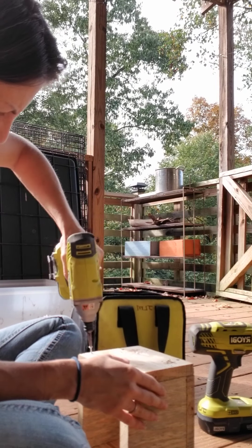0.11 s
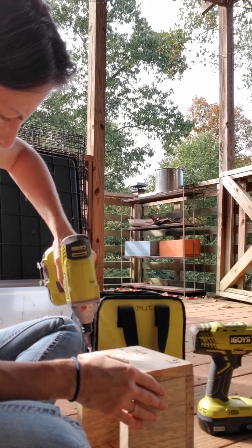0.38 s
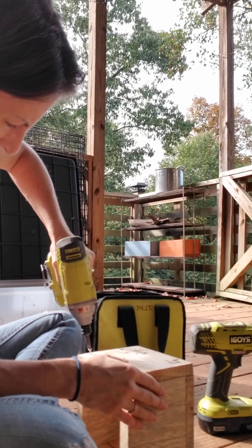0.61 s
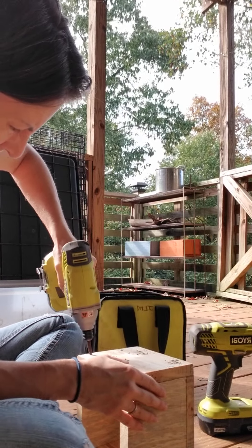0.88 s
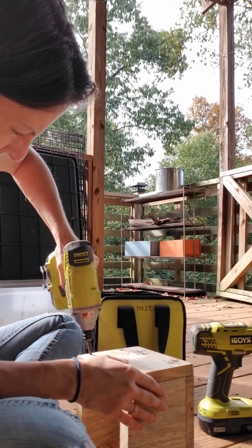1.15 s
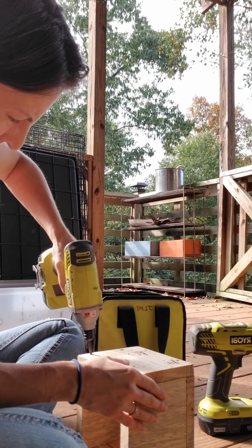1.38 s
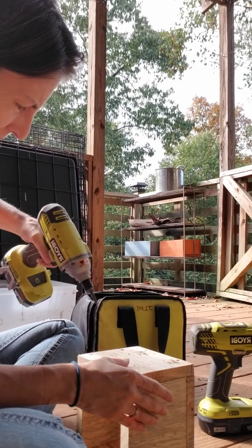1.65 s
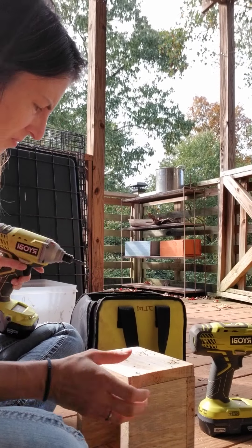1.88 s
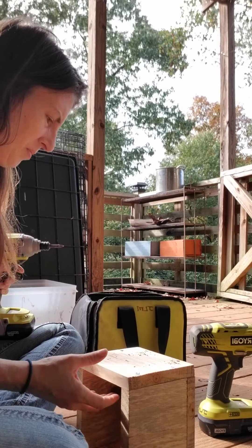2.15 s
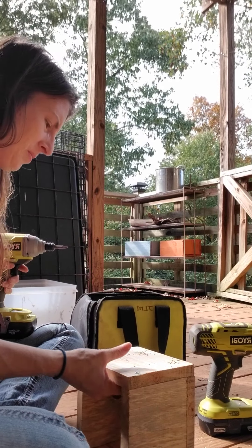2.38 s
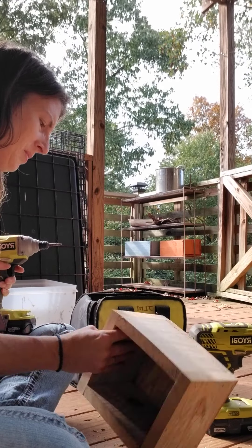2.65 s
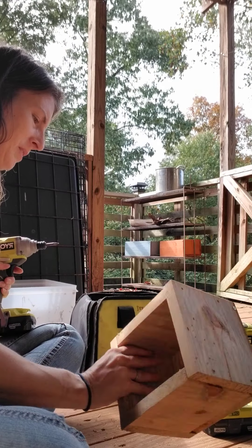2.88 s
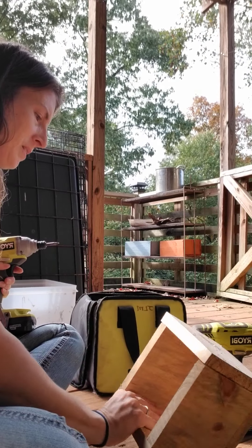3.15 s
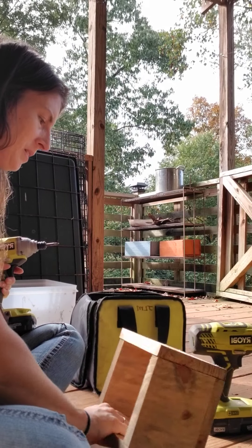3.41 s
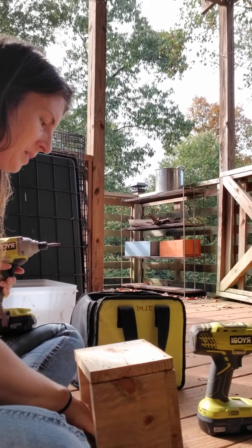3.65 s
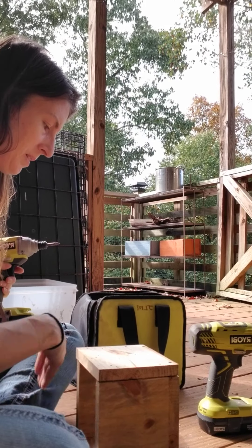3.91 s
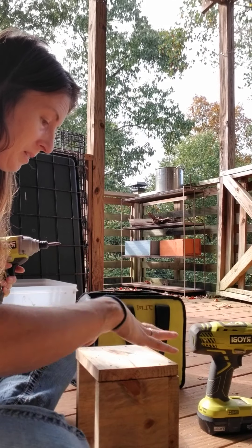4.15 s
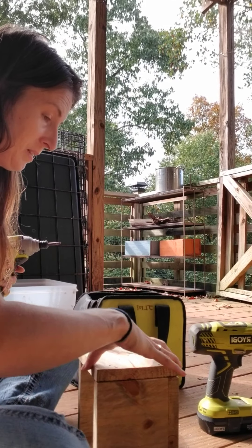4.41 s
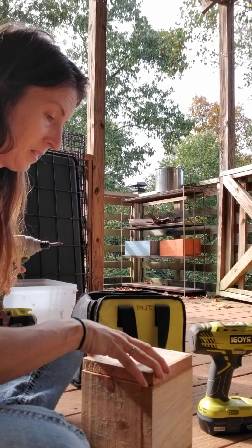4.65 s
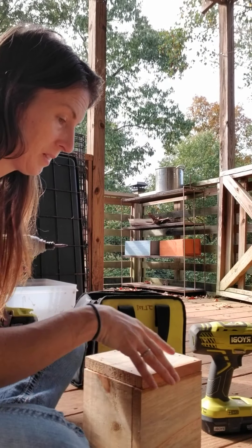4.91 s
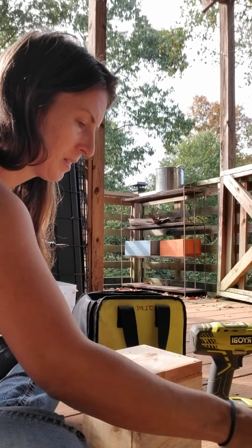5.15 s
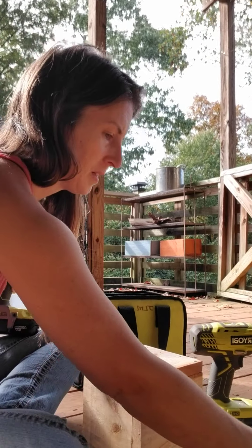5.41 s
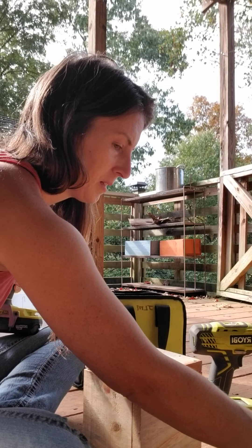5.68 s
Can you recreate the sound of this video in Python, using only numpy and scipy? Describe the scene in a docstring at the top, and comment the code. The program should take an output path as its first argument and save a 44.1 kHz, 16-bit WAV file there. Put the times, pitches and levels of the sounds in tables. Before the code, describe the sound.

Close up on a roofed wooden deck, a cordless driver whines and chatters into a hollow box, then pulses twice more with sharp knocks and steel clacks. Its ratchet clicks slow down, and thin metal rings faintly. The box is tipped, bangs down hard, and is slid and tapped over a low outdoor rumble and faint insects. Stereo, near microphone, stronger on the right.

```python
"""Over a low outdoor rumble and a band of insects, a cordless driver is pulsed three times into a hollow wooden box on
a roofed wooden deck: its gears whine (sine waves), its bit chatters (thuds), steel parts clack (short noise).
A ratchet clicks as the driver coasts, then a thin steel part rings as the driver is lifted.
The box is then tipped, set down and slid about (decaying sines, gritty noise) while a bird whistles once."""
import sys
import numpy as np
from scipy import signal
from scipy.fft import rfft, irfft
from scipy.io import wavfile
from scipy.ndimage import uniform_filter1d

SR = 44100
rng = np.random.default_rng(int(sys.argv[2]) if len(sys.argv) > 2 else 0)


def attenuation_scalar(level_db):
    """Turn a level in dB into a linear amplitude multiplier (20 dB per decade)."""
    decades = np.asarray(level_db, float) / 20
    return 10 ** decades


def generate_wav(sig):
    """Save sig (samples, or channels by samples) to the path in sys.argv[1] as 16-bit PCM at SR."""
    pcm = np.round(np.clip(np.atleast_2d(sig).T, -1, 1) * 32767).astype(np.int16)
    wavfile.write(sys.argv[1], SR, pcm)


N = 255339
T = np.arange(N) / SR  # time of each sample, s
HZ = np.maximum(np.fft.rfftfreq(N, 1 / SR), 1)  # pitch of each step in a spectrum


def rms_one(x):
    """Scale to an average strength (rms) of 1."""
    return x / np.sqrt(np.mean(x ** 2) + 1e-20)


def at_hz(points):
    """Join (pitch, level) points by lines over the logarithm of pitch, one value per spectrum step."""
    pitch_hz, level_db = np.transpose(points)
    return np.interp(np.log(HZ), np.log(pitch_hz), level_db)


def colour(x, points):
    """Filter to the given spectrum, answering as early as that spectrum allows (minimum phase)."""
    cepstrum = irfft(at_hz(points) * np.log(10) / 20, N)
    # folding the second half onto the first leaves nothing sounding before its cause
    cepstrum[1:N // 2] *= 2
    cepstrum[N // 2 + 1:] = 0
    return irfft(rfft(x, N) * np.exp(rfft(cepstrum)), N)


def drift(rate_hz):
    """Slow random wandering with an average strength of 1: noise smoothed twice."""
    r = np.exp(-2 * np.pi * rate_hz / SR)
    noise = rng.standard_normal(N + SR)
    settled = signal.lfilter([1], [1, -2 * r, r * r], noise)[SR:]
    return rms_one(settled)


def grains(spread_db):
    """Stereo noise with uneven sample sizes: grit rather than hiss, with differing treble left and right."""
    size_db = spread_db * np.minimum(rng.exponential(1, N), 5)
    mid, side = rng.standard_normal((2, N)) * attenuation_scalar(size_db)
    side = signal.sosfilt(signal.butter(2, 1700, "high", fs=SR, output="sos"), side)
    return mid + 0.72 * side * [[1], [-1]]


def ring(clicks, hz, t60_s):
    """A resonance: each unit click starts a sine that fades by 60 dB in t60_s."""
    r, w = attenuation_scalar(-60 / (t60_s * SR)), 2 * np.pi * hz / SR
    return signal.lfilter([0, np.sin(w)], [1, -2 * r * np.cos(w), r * r], clicks + 1e-18)


def burst(t60_s, attack_s=0.0001):
    """Outline of a hit: a quick rise, then a fade of 60 dB in t60_s."""
    t = np.arange(int(1.2 * t60_s * SR) + 64) / SR
    return (1 - np.exp(-t / attack_s)) * attenuation_scalar(-60 * t / t60_s)


def stroke(start_s, rise_s, hold_s, level_db, fall_db_per_s):
    """Gain that swells from 27.5 dB down, holds and falls, straight in dB; silent before start_s."""
    t = T - start_s
    rise_db = 27.5 * np.clip(1 - t / rise_s, 0, 1)
    fall_db = fall_db_per_s * np.maximum(t - rise_s - hold_s, 0)
    return (t > 0) * attenuation_scalar(level_db - rise_db - fall_db)


def add(out, start_s, sound):
    """Mix a sound in at time start_s."""
    i = round(start_s * SR)
    out[i:i + len(sound)] += sound[:N - i]


# level of the outdoor background, heard in rumble and insects: (start_s, level_db)
BACKGROUND_LEVEL = [(0, -35.5), (.7, -50), (1.5, -46), (2.2, -50), (3.4, -41), (4.5, -40), (5.79, -41.5)]


def background_level_db():
    """The background's level in time, joined by straight lines."""
    start_s, level_db = np.transpose(BACKGROUND_LEVEL)
    return np.interp(T, start_s, level_db, left=-120, right=-120)


# spectrum of the rumble: (pitch_hz, relative level_db)
RUMBLE_SPECTRUM = [(15, -53.5), (25, -24.5), (76, -3.5), (153, -1), (301, -18.5), (451, -19), (734, -29),
                   (863, -35), (1520, -48), (4740, -56), (6050, -58), (9570, -61.5), (16000, -52.5)]
# how alike left and right are: (pitch_hz, likeness from 0 to 1)
LIKENESS = [(60, 1), (380, 0.92), (2380, 0.041), (15000, 0.03)]
# far machinery, levels against the rumble before a shared lift: (pitch_hz, level_db)
FAR_HUMS = [(457.6, -62), (834.4, -75.5), (1001, -78.5)]


def rumble():
    """Wide low noise with faint wavering hums: deep tones are alike on both sides, high ones are not."""
    alike = np.clip(at_hz(LIKENESS), 0, 1)
    mid, side = rfft(rng.standard_normal((2, N)))
    stereo = np.sqrt(1 + alike) * mid + np.sqrt(1 - alike) * side * [[1], [-1]]
    noise = rms_one(irfft(attenuation_scalar(at_hz(RUMBLE_SPECTRUM)) * stereo, N))
    balance_db = np.array([[-1.], [1.]])  # left, right
    noise = noise * attenuation_scalar(0.59 * drift(20) + balance_db)
    hums = 0
    for pitch_hz, level_db in FAR_HUMS:
        gain = attenuation_scalar(level_db + 46 + drift(3.4))
        hums = hums + gain * np.sin(2 * np.pi * pitch_hz * T + 0.5 * drift(5.4))
    return attenuation_scalar(background_level_db()) * (noise + hums)


def insects():
    """A flickering band of noise near 6 kHz that rises and falls with the background level."""
    band = signal.butter(3, [5350, 6550], "band", fs=SR, output="sos")
    noise = rms_one(signal.sosfilt(band, rng.standard_normal((2, N))))
    swing_db = background_level_db() - np.mean(BACKGROUND_LEVEL, axis=0)[1]
    return attenuation_scalar(-79.5 + 0.96 * swing_db + 2 * drift(25)) * noise


# one whistle: (start_s, rise_s, hold_s, level_db, fall_db_per_s)
BIRD_STROKE = (3.8, .2, .2, -81, 90)


def bird():
    """One whistle: a sine that steadily falls in pitch and flickers in level."""
    pitch_hz = 3620 - 1100 * (T - BIRD_STROKE[0])
    whistle = np.sin(2 * np.pi * np.cumsum(pitch_hz) / SR)
    return stroke(*BIRD_STROKE) * attenuation_scalar(3 * drift(30)) * whistle


# wood and skin sliding on wood; swish_db is the bright part against the dull part:
# (start_s, rise_s, hold_s, level_db, fall_db_per_s, swish_db)
SLIDE_STROKES = [(2.462, .03, 0.23, -65.5, 42, -11.5), (3.387, 0.22, 0.027, -54.5, 64, -16.5),
                 (3.702, 0.043, .17, -73, 604, -2.5), (4.37, 0.017, 0.15, -56.5, 200, -18),
                 (4.535, 0.037, .01, -50.5, 81, -16), (4.792, .12, .08, -68.5, 501, 0.5),
                 (4.949, .05, .9, -74, 100, -8)]
# spectrum of the dull part: (pitch_hz, relative level_db)
SLIDE_SPECTRUM = [(200, -17.5), (400, -10.5), (950, 3), (1400, -13), (2500, -17.5), (3500, -19),
                  (6000, -26), (9000, -54.5)]


def slides():
    """Wood and skin rub on wood: dense grit swells and falls, with a brighter swish on top."""
    swish_spectrum = [(6500, -34), (8500, -3.0), (10500, -14.5), (13000, -2.5), (15500, -6)]
    dull = rms_one(colour(grains(2.5), SLIDE_SPECTRUM)) * attenuation_scalar(2 * drift(30))
    swish = rms_one(colour(grains(3), swish_spectrum)) * attenuation_scalar(2 * drift(17))
    return sum(stroke(*row[:5]) * (dull + attenuation_scalar(row[5]) * swish) for row in SLIDE_STROKES)


# ways the box rings: (pitch_hz, relative level_db, t60_s = time to fade 60 dB)
BOX_MODES = [(77, -8, .08), (140, -3, .08), (190, -4, .05), (275, -5, .07), (424, -6, .06), (545, -4, .05),
             (600, -6, .05), (680, -8, .04), (880, -14, .03), (1100, -19, .025)]


def box_body(level_db, hardness_db, chances):
    """The box's ringing tones, each with a chance strength and pitch; hard blows favour the high ones."""
    t = np.arange(SR // 2) / SR
    body = 0
    for k, ((pitch_hz, mode_db, t60_s), chance) in enumerate(zip(BOX_MODES, chances)):
        start_db = mode_db + hardness_db * np.log2(pitch_hz / 400) + 2 * chance
        tone = np.sin(2 * np.pi * pitch_hz * (1 + .025 * chance) * t)
        body = body + (-1) ** k * attenuation_scalar(start_db - 60 * t / t60_s) * tone
    # the onset is stronger, for longer when the blow is light
    push_s = max(.0022 - .00006 * level_db, .0005)
    body *= -2.5 - np.exp(-t / push_s)
    return attenuation_scalar(level_db) * body / np.abs(body).max()


# thin edge of the box: (pitch_hz, level_db against the crack, t60_s)
EDGE_MODES = [(2550, -10, .04), (3600, -9, .035)]


def box_edge(level_db, chances):
    """The thin edge of the box rings with the crack."""
    t = np.arange(SR // 2) / SR
    tones = 0
    for (pitch_hz, mode_db, t60_s), chance in zip(EDGE_MODES, chances):
        gain = attenuation_scalar(level_db + mode_db + 2.6 * chance - 60 * t / t60_s)
        tones = tones + gain * np.sin(2 * np.pi * pitch_hz * (1 + 0.023 * chance) * t)
    return tones


# blows on box and deck; crack_db is against the blow: (start_s, level_db, hardness_db per octave, crack_db)
BLOWS = [(0.762, -16, 0.5, -18), (0.793, -11.5, -1, -22), (1.09, -30.5, 9, -22), (1.109, -16, 28, -27.5),
         (1.174, -14, 3, -19.5), (1.216, -35, -17, -29.5), (1.254, -18, 2, -29), (1.357, -27, 11, -22),
         (2.474, -46.5, 21, -13.5), (2.542, -37, 7, -35), (3.088, -11, -2, -21.5), (3.191, -15.5, -4, -26),
         (3.254, -12, 1, -37.5), (3.333, -12.5, -1, -33), (3.355, -26, 1, -41), (3.5642, 0.5, 4, -30),
         (3.695, -19, -4, -23.5), (3.894, -25, -3, -36), (4.435, -36, 1.5, -15), (4.572, -23, -0.5, -22.5),
         (4.612, -22, -4.5, -25.5), (4.636, -21.5, 2.5, -21.5), (4.685, -26, -3, -24),
         (4.722, -23.5, -1, -34)]
# spectrum of the crack: (pitch_hz, relative level_db)
CRACK_SPECTRUM = [(500, -3), (1500, -5.5), (2500, 4), (3500, -8), (6500, -23), (8500, -13.5),
                  (12500, -21.5), (16000, -22)]
# spectrum of the shuddering deck boards: (pitch_hz, relative level_db)
SHUDDER_SPECTRUM = [(50, -8.5), (90, 5), (250, 19), (600, 3), (1000, -21), (1500, -23.5), (2500, -47.5),
                    (3500, -52), (8000, -53)]
# spectrum of the boards clattering on: (pitch_hz, relative level_db)
RATTLE_SPECTRUM = [(700, -17), (1300, -1), (2000, 1), (2700, 1.5), (3300, -11.5), (5000, -19),
                   (9000, -23.5), (16000, -38.5)]


def blows():
    """Each blow rings the box, cracks briefly at its edge and leaves loose deck boards shaking as noise."""
    tones, cracks, shudders, rattles = np.zeros((4, N))
    chance = rng.standard_normal((len(BLOWS), len(BOX_MODES)))
    for (start_s, level_db, hardness_db, crack_db), chances in zip(BLOWS, chance):
        edge_s = start_s + .003  # the edge lands after the body
        add(tones, start_s, box_body(level_db, hardness_db, chances))
        add(tones, edge_s, box_edge(level_db + crack_db, chances))
        add(cracks, edge_s, attenuation_scalar(level_db + crack_db) * burst(0.032, attack_s=0.0019))
        add(shudders, start_s, attenuation_scalar(level_db - 18.5) * burst(0.27, attack_s=0.0034))
        # clattering grows faster than the blow itself
        add(rattles, start_s, attenuation_scalar(1.6 * level_db - 34) * burst(.35, attack_s=.005))
    shudder = shudders * rms_one(colour(grains(2.7), SHUDDER_SPECTRUM))
    rattle = rattles * rms_one(colour(grains(5), RATTLE_SPECTRUM))
    crack = cracks * rms_one(colour(grains(2), CRACK_SPECTRUM))
    return tones + shudder + rattle + crack


# the driver's chuck rings once: (start_s, level_db, pitch_hz, t60_s)
CHUCK_RING = (1.3165, -21, 1090, .04)


def chuck_ring():
    """The driver's chuck rings once: one short fading tone."""
    start_s, level_db, pitch_hz, t60_s = CHUCK_RING
    envelope = burst(t60_s, attack_s=.003)
    out = np.zeros(N)
    add(out, start_s, attenuation_scalar(level_db) * envelope * np.sin(2 * np.pi * pitch_hz * T[:len(envelope)]))
    return out


def ratchet():
    """Coasting ratchet clicks as clack rows: ever slower, softer in steps, two clicks at about the same level."""
    return [(1.262 + .0186 * k + .00015 * k * k, -14 - 1.48 * k - 1.5 * (k % 2), 0.018) for k in range(11)]


# steel clacks in the driver: (start_s, relative level_db, t60_s)
STEEL_CLACKS = [(0.7721, -2, 0.014), (0.7874, -7.5, 0.022), (0.8141, 5.5, 0.0038), (0.848, -12.5, 0.016),
                (0.9011, -36, 0.067), (1.042, -23, 0.0064), (1.0836, -24, 0.024), (1.096, -24.5, 0.021),
                (1.1137, -14, 0.012), (1.1221, -5.5, 0.028), (1.1416, -7.5, 0.0085), (1.1713, -9, 0.015),
                (1.1812, 0, 0.012), (1.2024, -23.5, 0.044), (1.2222, -22.5, 0.014), (1.2553, -21, 0.071)]
# ticks of hard parts in the hands: (start_s, relative level_db)
HAND_TICKS = [(0.4996, -54.5), (1.0146, -42), (2.5337, -52), (2.6239, -31), (2.9794, -55), (3.705, -39),
              (4.3954, -54), (4.556, -37.5), (4.569, -45.5), (4.586, -50.5), (4.6, -43), (5.49, -54)]
# spectrum of steel and grit: (pitch_hz, relative level_db)
CLACK_SPECTRUM = [(710, -14.5), (1200, -6), (1700, -4.5), (3590, 0), (4170, -5), (5130, -4), (6510, -14.5),
                  (7410, -15), (8820, -9), (10500, -16.5), (12500, -7), (15200, -20.5), (16000, -26.5)]


def clacks():
    """Hard parts strike each other: short bursts of bright noise."""
    envelope = np.zeros(N)
    ticks = [(start_s, level_db, .016) for start_s, level_db in HAND_TICKS]
    for start_s, level_db, t60_s in STEEL_CLACKS + ratchet() + ticks:
        add(envelope, start_s, attenuation_scalar(level_db - 5.5) * burst(np.clip(t60_s, .005, .3)))
    return envelope * rms_one(colour(grains(1.6), CLACK_SPECTRUM))


# tones of the thin steel part: (pitch_hz, relative level_db, t60_s)
TINK_TONES = [(2160, -11, 0.25), (2680, -1, 0.61), (8320, 1, 0.34)]


def tink():
    """A thin steel part shakes as the driver is lifted: noise through resonances, in a puff of hiss."""
    start_s, tones_db, puff_db = 1.787, -66.5, -59
    puff = np.zeros(N)
    add(puff, start_s, attenuation_scalar(puff_db) * burst(0.16, attack_s=0.01))
    out = puff * rms_one(colour(grains(1.6), CLACK_SPECTRUM))
    for pitch_hz, level_db, t60_s in TINK_TONES:
        shake = np.zeros(N)
        add(shake, start_s, attenuation_scalar(tones_db + level_db) * burst(t60_s, attack_s=0.0056))
        out += shake * rms_one(ring(rng.standard_normal(N), pitch_hz, 0.024))
    return out


# the bit chattering in the hole: (start_s, rise_s, hold_s, level_db, fall_db_per_s)
CHATTER_STROKE = (.0865, .0055, .171, -13, 1500)
# spectrum of one slip: (pitch_hz, relative level_db)
SLIP_SPECTRUM = [(47, -32.5), (80, -4), (272, -5.5), (407, -5.5), (559, -3), (861, -5), (1620, -19.5),
                 (2500, -30), (3250, -52), (5500, -120)]


def chatter():
    """The bit grips and slips: one thud a slip, uneven in strength, each shaking loose some grit."""
    top_hz, top_s, sag_hz_per_s2 = 134, .19, 1300  # slips are fastest mid-way
    slip_hz = np.maximum(top_hz - sag_hz_per_s2 * (T - top_s) ** 2, 0) * (T > CHATTER_STROKE[0])
    slip_count = .5 + np.cumsum(slip_hz * (1 + 0.02 * drift(70))) / SR
    slips = np.diff(np.floor(slip_count), prepend=0) * attenuation_scalar(1.5 * rng.standard_normal(N))
    # grit starts 40 samples after each slip and fades by 60 dB in 6.9 ms
    grit_gain = signal.lfilter([1], [1, -attenuation_scalar(-60 / (0.0069 * SR))], np.roll(slips, 40))
    thuds = colour(slips + 0.11 * grit_gain * rng.standard_normal(N), SLIP_SPECTRUM)
    grit = colour(grit_gain * grains(0.67), CLACK_SPECTRUM)
    sounding = (T > .1) & (T < .26)  # both are levelled over this stretch
    thuds = thuds / np.std(thuds[sounding])
    grit = grit / np.std(grit[:, sounding])
    return stroke(*CHATTER_STROKE) * (thuds + attenuation_scalar(-24) * grit)


# trigger half pressed: (start_s, end_s, level_db)
HALF_PRESSES = [(0.486, 0.516, -61.5), (1.021, 1.059, -64)]


def switching():
    """The half-pressed trigger's switching whine: a steady high sine, flickering in strength."""
    out = np.zeros(N)
    for start_s, end_s, level_db in HALF_PRESSES:
        pressed = uniform_filter1d(((T > start_s) & (T < end_s)) * 1., size=200)
        out += attenuation_scalar(level_db) * pressed * (.5 + drift(300)) * np.sin(2 * np.pi * 12500 * T)
    return out


# trigger pulls: (start_s, end_s, full hiss level_db, spin_up_s, coast_s = time to lose 45 dB)
TRIGGER_PULLS = [(-.05, 0.236, -24.5, 0.01, 0.19), (0.492, 0.823, -33.5, 0.051, 0.2377),
                 (1.044, 1.18, -24.5, 0.11, 0.3339)]
# spectrum of brush and fan hiss: (pitch_hz, relative level_db)
HISS_SPECTRUM = [(290, -44), (500, -20), (740, -4.5), (880, -17), (1130, -3.5), (1740, -9.5), (1980, -2.5),
                 (2610, -4), (3860, -4.5), (7000, -25), (8090, -13.5), (9490, -28), (12400, -18),
                 (14000, -20.5), (15100, -16.5), (16000, -19)]
# spectrum of the grinding bit: (pitch_hz, relative level_db)
GRIND_SPECTRUM = [(35, -47.5), (60, -11), (129, 2.5), (344, -7.5), (416, 3.5), (748, -6), (1060, -0.5),
                  (2000, -23.5), (2600, -43), (4400, -120)]
# the bit bites into the wood: (start_s, rise_s, hold_s, level_db, fall_db_per_s)
BIT_BITES = [(0.091, 0.02, .002, -12, 593), (0.178, 0.071, .01, -22.5, 440),
             (0.737, 0.073, .002, -30.5, 232.5), (1.063, 0.035, .18, -30.5, 184)]


def hiss_and_grind():
    """Brush and fan hiss swells with each pull and coasts down; the bit grinds, most as it bites."""
    hiss = rms_one(colour(grains(2), HISS_SPECTRUM)) * attenuation_scalar(1.5 * drift(60))
    grind = rms_one(colour(grains(3), GRIND_SPECTRUM)) * attenuation_scalar(3.5 * drift(60))
    spin = np.zeros(N)
    for start_s, end_s, level_db, spin_up_s, coast_s in TRIGGER_PULLS:
        short_db = 26.5 * np.exp(-np.maximum(T - start_s, 0) / spin_up_s)
        coast_db = 45 * (np.maximum(T - end_s, 0) / coast_s) ** 0.91
        spin += (T > start_s) * attenuation_scalar(level_db - short_db - coast_db)
    bites = sum(stroke(*bite) for bite in BIT_BITES)
    return spin * hiss + (attenuation_scalar(-13.5) * spin + bites) * grind


# gear whine as the motor spins up freely; dies_s is the time under load to lose 30 dB:
# (standstill_s, spin_up_s, loaded_s, dies_s, level_db)
GEAR_WHINES = [(-.035, .058, .088, .025, -19.5), (.575, .04, .715, .08, -33)]
# tooth tones: (multiple of the tooth rate, relative level_db, wavering_hz)
TOOTH_TONES = [(.66, -12, 40), (1, -4, 15), (1.5, -10, 40), (2, 0, 15), (2.33, -10, 50), (2.7, -10, 80),
               (3, -3, 25)]
# cooling fan at free speed: (pitch_hz, relative level_db)
FAN_SPECTRUM = [(6500, -30), (8100, -7), (10000, -14), (12400, 0), (14000, -9), (15100, -1.5),
                (16000, -9.5)]


def whine():
    """Gear teeth meet at a rate that climbs with speed and sags under load; each multiple is a wavering sine."""
    free_hz, sag_hz_per_s2 = 1450, 150000
    housing_hz, housing_octaves, housing_db = 3450, .2, 4  # the housing lifts tones that pass this pitch
    fan = rms_one(colour(grains(2), FAN_SPECTRUM))
    out = np.zeros((2, N))
    for standstill_s, spin_up_s, loaded_s, dies_s, level_db in GEAR_WHINES:
        speed_share = 1 - np.exp(-np.maximum(T - standstill_s, 0) / spin_up_s)
        load_s = np.maximum(T - loaded_s, 0)
        tooth_hz = np.maximum(free_hz * speed_share - sag_hz_per_s2 * load_s ** 2, 1)
        teeth_passed = np.cumsum(tooth_hz) / SR
        set_in = np.clip((speed_share - .54) * 10, 0, 1)  # silent below 54 % of free speed
        gain = set_in * attenuation_scalar(level_db - 21.5 * (1 - speed_share) - 30 * (load_s / dies_s) ** 4)
        out += gain * attenuation_scalar(-11) * fan
        for multiple, tone_db, wavering_hz in TOOTH_TONES:
            phase = 2 * np.pi * multiple * teeth_passed + .3 * drift(wavering_hz)
            wave = (1 + .3 * drift(wavering_hz)) * np.sin(phase)
            octaves_off = np.log2(multiple * tooth_hz / housing_hz)
            lift_db = housing_db * np.exp(-(octaves_off / housing_octaves) ** 2)
            out += gain * attenuation_scalar(tone_db + lift_db) * wave
    return out


def echoes():
    """Scattered reflections under the roof: fading noise, thin in the bass, unlike left and right in the treble."""
    t60_s, level_db = 0.2, -10.5
    t = np.arange(SR // 2) / SR
    mid, side = rng.standard_normal((2, len(t))) * attenuation_scalar(-60 * t / t60_s) * (t > .004)
    mid = signal.sosfilt(signal.butter(1, 300, "high", fs=SR, output="sos"), mid)
    side = signal.sosfilt(signal.butter(2, 800, "high", fs=SR, output="sos"), side)
    tails = np.array([mid + side, mid - side])
    return attenuation_scalar(level_db) * tails / np.sqrt(np.sum(tails[0] ** 2))


# left side, turned away from the work, against the right: (pitch_hz, level_db)
LEFT_SHADOW = [(60, -5.5), (180, -5.5), (550, 0.5), (1650, -2.5), (4970, -7), (15000, -12)]


def on_deck(x):
    """Direct sound, later and shadowed on the left, plus a short tail under the roof."""
    # only long waves have the full lag; in the treble the left phase lag levels off
    lag_s, top_lag_rad = 0.00035, 1.8
    lag = np.exp(-1j * top_lag_rad * np.tanh(2 * np.pi * HZ * lag_s / top_lag_rad))
    half = attenuation_scalar(at_hz(LEFT_SHADOW) / 2)  # half the difference goes to each side
    direct = irfft(rfft(x) * np.array([half * lag, 1 / half]), N)
    return direct + signal.fftconvolve(direct, echoes(), axes=1)[:, :N]


def scene():
    """Everything near plays through the deck; the outdoors lies around it."""
    outdoors = rumble() + insects() + bird()
    box = slides() + blows() + chuck_ring()
    driver = clacks() + tink() + chatter() + switching() + hiss_and_grind() + whine()
    return on_deck(box + driver) + outdoors


def roll_off(x):
    """The treble ends steeply here."""
    return signal.sosfilt(signal.butter(12, 16800, fs=SR, output="sos"), x)


def record(dry):
    """The microphone falls off steeply at the top, by 28 dB within 150 Hz, and peaks are rounded."""
    top_cut_db = -28 * np.clip((HZ - 15900) / 150, 0, 1)
    heard = irfft(rfft(dry) * attenuation_scalar(top_cut_db), N)
    mix = 0.98 * np.tanh(heard / 0.91)
    return roll_off(mix)


dry = scene()
out = record(dry)
generate_wav(out)
```